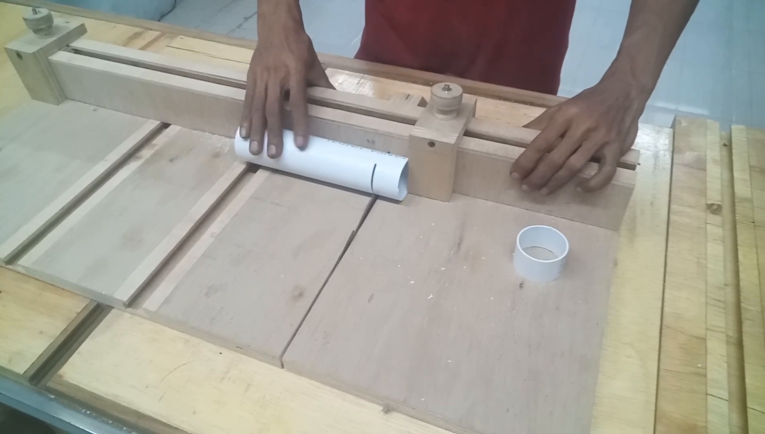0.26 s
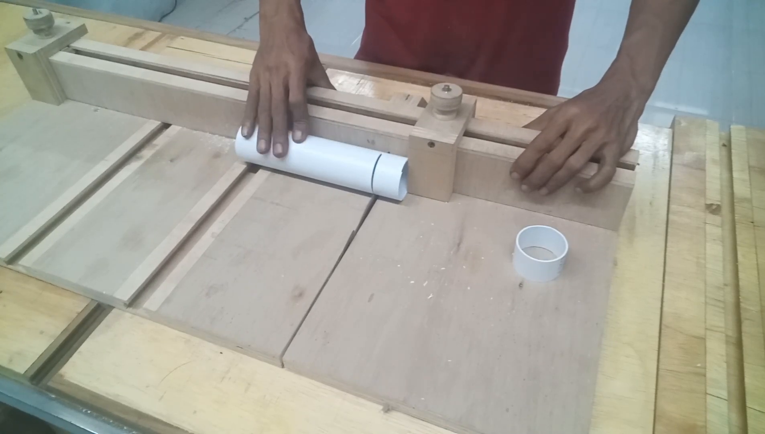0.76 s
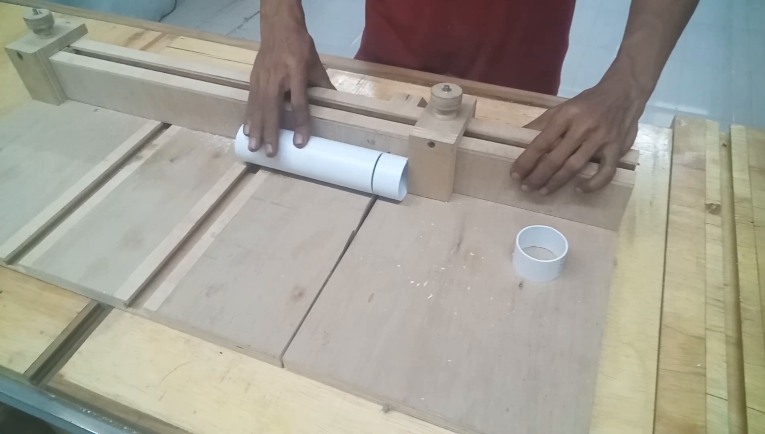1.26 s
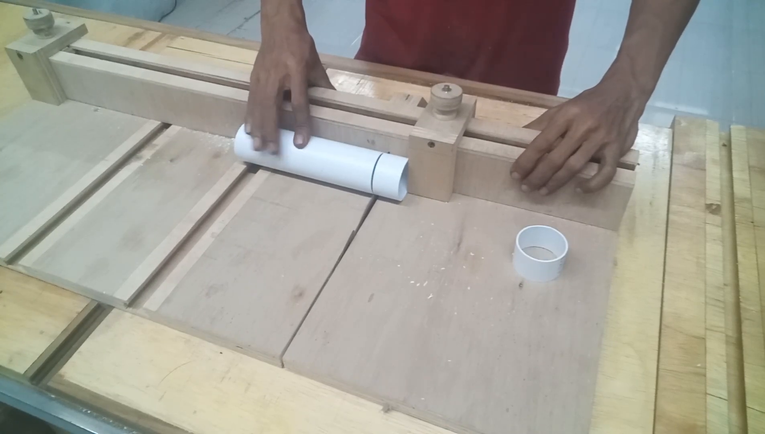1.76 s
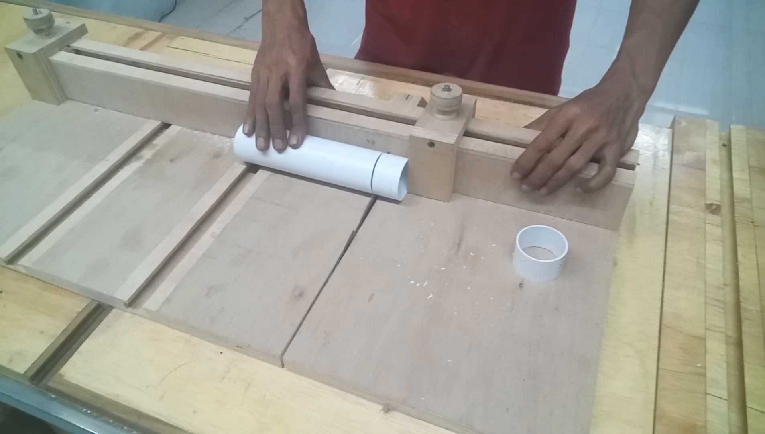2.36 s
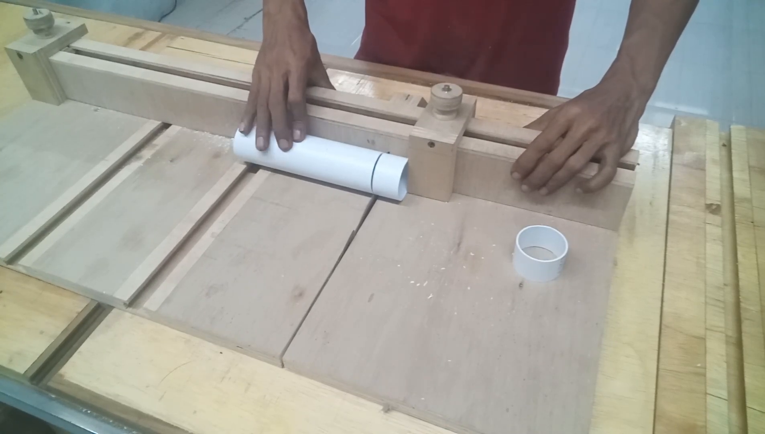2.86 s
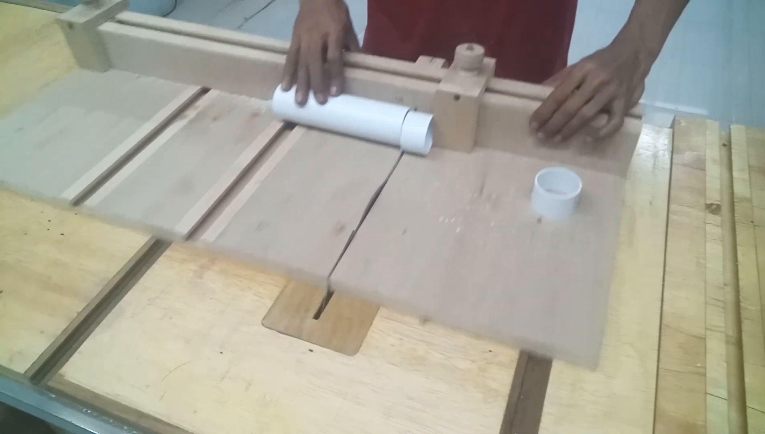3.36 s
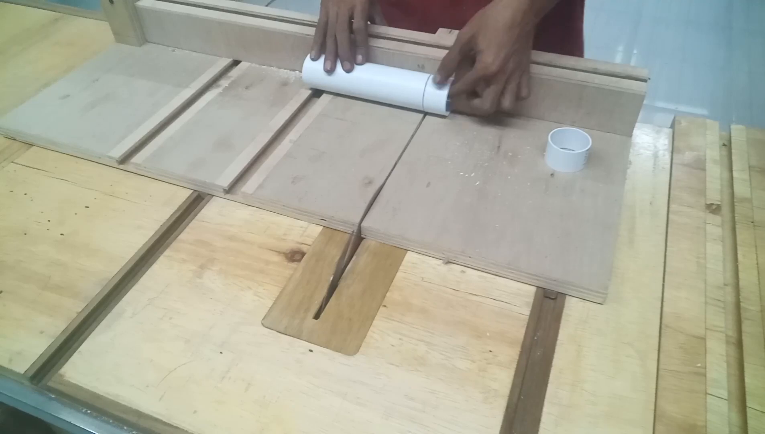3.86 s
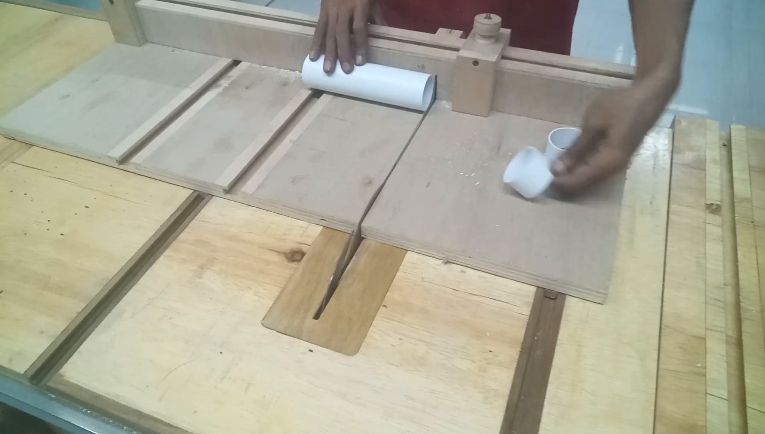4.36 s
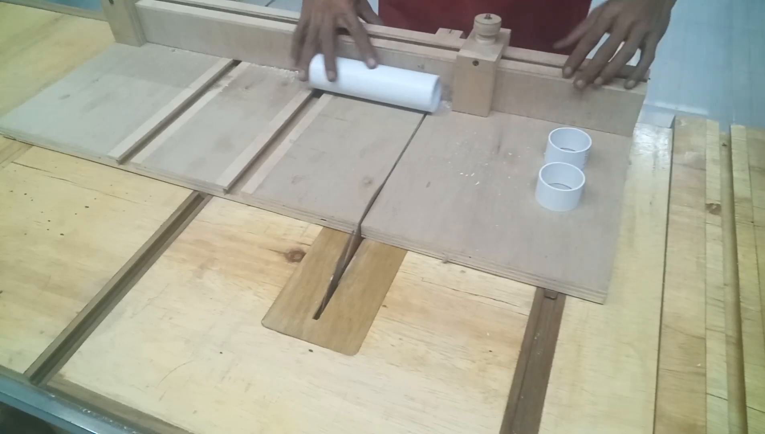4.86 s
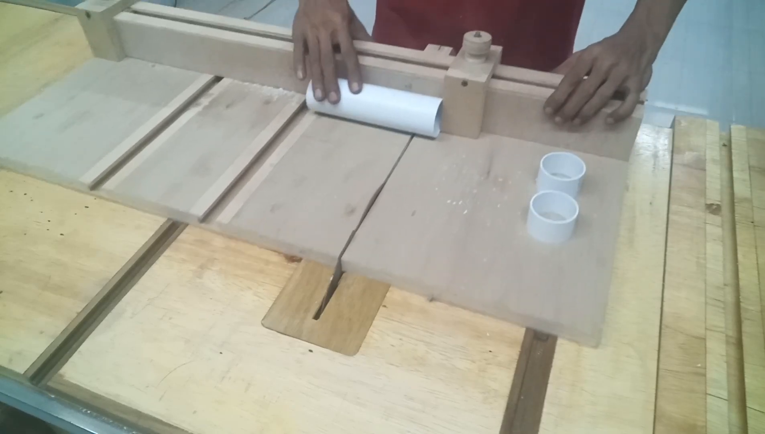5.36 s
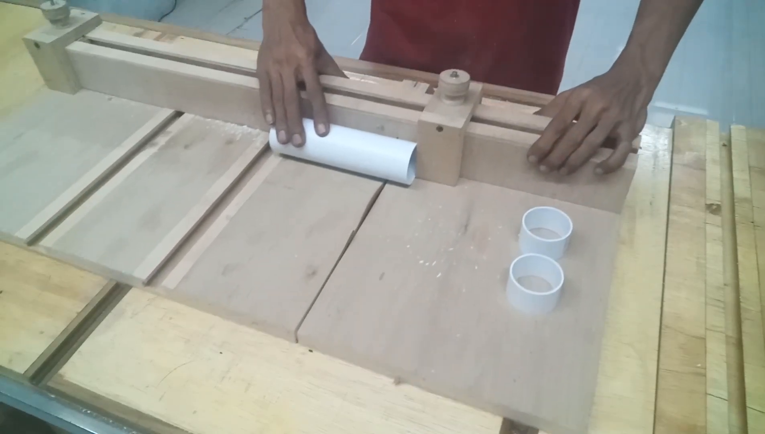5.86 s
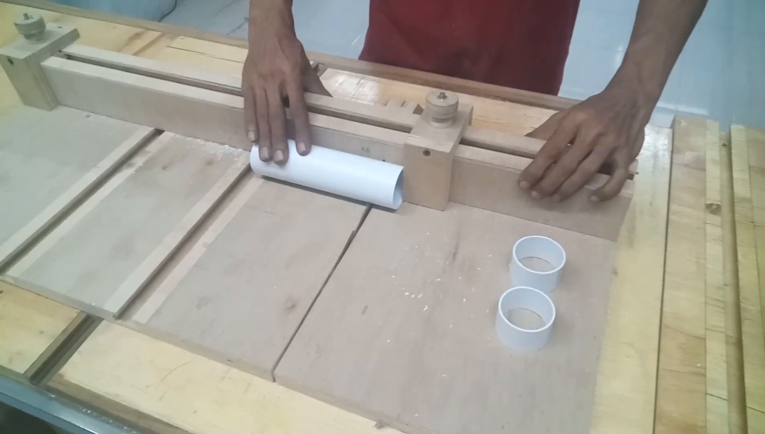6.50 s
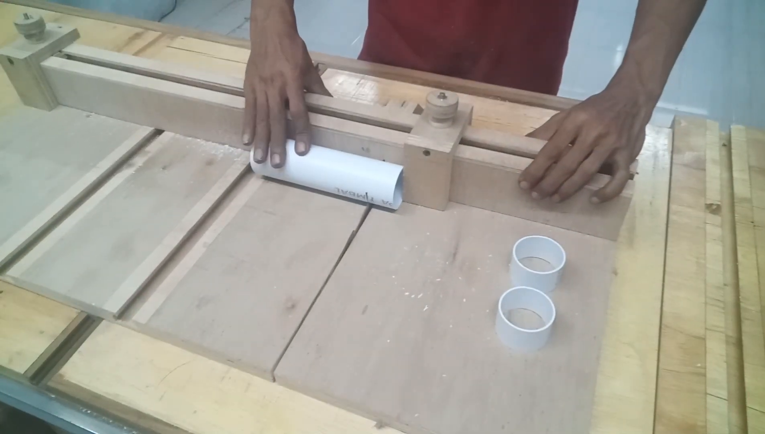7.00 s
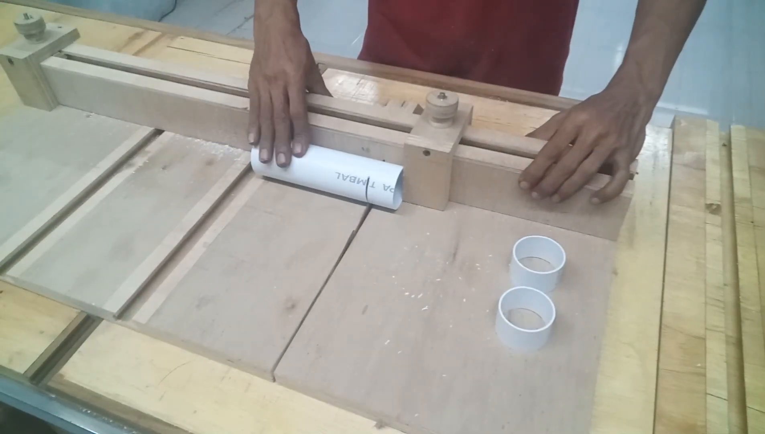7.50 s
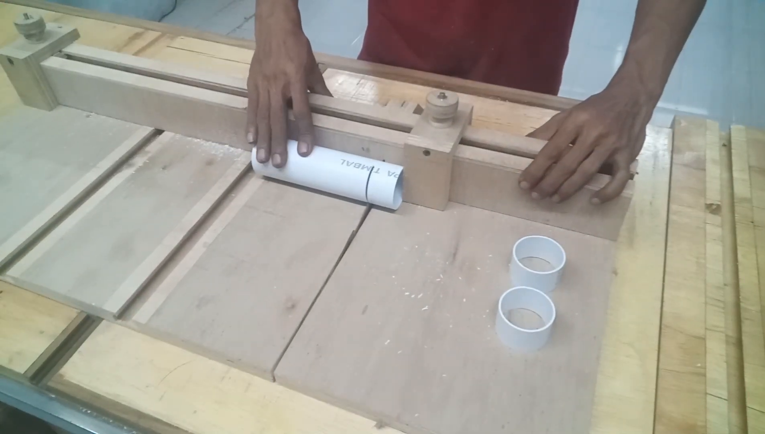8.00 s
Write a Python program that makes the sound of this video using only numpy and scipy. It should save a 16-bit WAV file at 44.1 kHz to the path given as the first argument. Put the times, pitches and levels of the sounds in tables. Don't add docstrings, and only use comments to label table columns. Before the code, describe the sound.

Close view of a small table saw in a light-walled workshop. Plastic pipe is rolled over the spinning blade in uneven pushes, giving shrill tooth whine, ringing pipe wall, hissing chips and wooden sled knocks. A small tick ends the cut near three seconds. The geared motor swells into a free whining roar, then a second, brighter cut begins with a hard knock at six seconds.

```python
import sys
import numpy as np
from scipy import signal
from scipy.fft import rfft, irfft, next_fast_len
from scipy.io import wavfile
from scipy.ndimage import uniform_filter1d

SR = 44100
rng = np.random.default_rng(int(sys.argv[2]) if len(sys.argv) > 2 else 0)


def to_wav(sig):
    pcm = np.clip(np.atleast_2d(sig), -1, 1) * 32767
    pcm = np.round(pcm).astype(np.int16)
    wavfile.write(sys.argv[1], SR, pcm.T)


def invert_db(level):
    return 10 ** (np.asarray(level, dtype=float) / 20)


N = 363384

# t/s, turns per second f/Hz
BLADE_SPEED = [(0, 82.9), (0.3, 82.9), (0.7, 82.42), (1.15, 82.38), (1.35, 82.72), (1.85, 82.62),
               (2.05, 82.95), (2.45, 82.83), (3, 83.3), (3.3, 83.12), (4.5, 83.8), (5.98, 83.8),
               (6.3, 82.42), (6.55, 82.8), (6.9, 82.88), (7.45, 82.66), (7.85, 82.4), (8.24, 82.65)]
# multiple of the gear rate, level/dB against the 2nd tone
UPPER_GEAR = [(4, -40), (5, -6), (7, -16.5), (11, -40), (12, -51), (25, -47), (30, -37.5)]
# f/Hz, level/dB per Hz
ROAR = [(30, -28), (60, -22), (90, -11.5), (300, -10.5), (800, -4.5), (1400, -5), (1900, -9.5), (3300, -9),
        (4500, -16.5), (6500, -24), (7600, -34.5), (10500, -38), (15500, -40)]
# f/Hz, width/Hz, level/dB over the roar
HOUSING = [(80.6, 13.4, 7), (169, 5.8, 8), (493, 3.1, 1), (650, 3.1, 2.5), (991, 29, 0.5), (1191, 8.9, -5),
           (1470, 4.5, -36), (2630, 63, 3), (3397, 18.5, 7.5), (6820, 24, 10), (11700, 500, 0.5),
           (13700, 920, 1.5)]
RIM_ERRORS = [(1, 0.62, .01), (2, 0.34, 0.072), (3, 0.19, 0.15), (4, 0.19, 0.66), (5, 0.095, 1.6),
              (6, 0.14, 4.8), (8, 0.1, 2.45), (10, 0.12, 5.3), (12, 0.1, 1.9), (14, 0.09, 3.5),
              (20, 0.09, 0.1)]
# f/Hz, level/dB per Hz
BITE = [(1700, -11), (2700, 9), (3300, 6), (3550, 8), (3850, 2.5), (4150, 10), (4400, -8), (5000, -9),
        (6600, -22), (9000, -25), (15500, -37)]
# f/Hz, level/dB per Hz
PIPE_RING = [(1400, -28), (1900, 10), (2150, 9), (2650, 10.5), (2950, -6), (3150, -33), (3500, -88)]
# f/Hz, level/dB per Hz
CHIPS = [(2500, -16), (3300, -1.5), (3800, -3.5), (4300, -16.5), (5500, -20), (7300, -20), (9300, -26.5),
         (12300, -25), (14300, -24), (15600, -28)]
# f/Hz, level/dB per Hz
SLED = [(35, -18), (80, 1.5), (165, 1), (250, -1), (330, -0.5), (600, -16.5), (1500, -14.5), (2500, -13.5),
        (4000, -72)]
# t/s, depth in runout heights
FEED = [(0.0, 1.1), (0.22, 1.2), (0.35, 0.88), (0.95, 1.1), (1.24, 0.72), (2.0, 0.95), (2.8, 1.3),
        (3.2, 1.2), (6.0, 0.33), (6.24, 0.17), (6.42, 4), (6.6, 0.87), (6.8, 1.7), (7.0, 2.2), (7.2, 2.5),
        (7.4, 1.8), (7.88, 2.1), (8.24, 2.5)]
# f/Hz, width/Hz, level/dB against the hiss
PLATE_MODES = [(4730, 660, -13.5), (6200, 610, -14), (8200, 410, -30), (10070, 240, -25.5),
               (11220, 690, -24.5), (13600, 1100, -17), (15500, 700, -19.5)]
# start t/s, end t/s, multiple of turn rate, level/dB
SINGING = [(0.07, 0.44, 42, -40), (0.1, 0.42, 50, -47), (0.17, 0.46, 30, -42), (0.17, 0.34, 34, -40),
           (0.17, 0.68, 37, -42), (0.21, 0.45, 28, -44), (0.23, 0.5, 32, -42), (0.53, 0.81, 28, -46),
           (1.29, 1.74, 36, -41), (1.31, 1.8, 43, -42), (1.32, 1.7, 37, -43), (1.55, 1.74, 32, -42),
           (1.98, 2.19, 42, -39), (2.0, 2.43, 30, -43), (2.01, 2.21, 50, -47), (0.52, 0.77, 32, -36),
           (2.11, 2.32, 37, -45), (2.39, 2.66, 36, -43), (2.41, 2.87, 42, -41), (2.49, 2.72, 37, -42),
           (2.56, 2.74, 50, -46), (2.99, 3.09, 32, -42), (7.03, 7.34, 38, -44), (6.33, 6.47, 28, -48),
           (1.3, 1.56, 32, -44), (6.99, 7.12, 50, -49), (6.96, 7.05, 60, -52), (7.55, 7.8, 32, -46),
           (6.3, 6.4, 32, -42), (8.0, 8.24, 38, -42), (2.52, 2.67, 30, -42), (2.54, 2.69, 35, -44),
           (2.58, 2.7, 44, -43), (2.65, 2.76, 41, -42), (2.84, 2.97, 67, -52), (7.47, 7.57, 39, -43),
           (7.59, 7.73, 38, -42), (7.67, 7.77, 41, -42), (8.09, 8.19, 37, -44), (8.11, 8.19, 42, -43),
           (0.18, 0.5, 41, -40), (0.55, 0.74, 43, -41), (6.0, 6.2, 41, -42), (6.0, 6.1, 42, -43),
           (0.86, 1.15, 47, -45), (0.95, 1.12, 39, -43), (0.88, 1.0, 45, -46), (1.3, 1.55, 56, -51),
           (0.5, 0.7, 60, -50), (1.99, 2.15, 41, -40), (2.22, 2.34, 39, -41), (2.2, 2.36, 42, -42),
           (0.3, 0.5, 39, -44), (6.84, 6.96, 40, -41)]
# start t/s, length/s, hiss level/dB, whine over hiss/dB, ring over hiss/dB
PUSHES = [(.055, 0.058, -39.5, 5, -9), (.17, 0.32, -35.5, 1, -5.5), (.5, 0.22, -37.5, 1, -3.5),
          (.82, 0.091, -42, 7.5, 0.5), (.9, 0.09, -40, 2.5, 1), (1.08, 0.1, -48.5, 8, 2),
          (1.27, 0.19, -40.5, 1, -2), (1.46, .05, -42, -3, -7), (1.52, 0.094, -34.5, -4.5, -7.5),
          (1.6, 0.11, -36.5, -2, -1), (1.73, .05, -44.5, 2, -9), (1.79, 0.087, -37.5, 3.5, -11),
          (1.86, 0.075, -33.5, -6, -4.5), (1.97, 0.15, -39.5, 9, -4), (2.2, 0.1, -47.5, 16, -1),
          (2.52, 0.16, -41.5, 8, -1.5), (2.75, 0.25, -40.5, -12, -4), (2.98, 0.089, -36.5, -15, 2.5),
          (2.84, .11, -50, 7, -5), (5.975, 0.11, -41.5, 4.5, -20), (6.1, 0.12, -41, 5, -6.5),
          (6.23, .15, -39, 2.5, -6.5), (6.51, 0.27, -40.5, 4.5, -21), (6.94, 0.17, -39, 6.5, -6),
          (7.09, 0.19, -41.5, -3, -5), (7.46, 0.17, -39.5, 1.5, -4), (7.6, 0.18, -38.5, -5, -4),
          (7.95, 0.099, -38.5, 1, -10), (8.04, 0.076, -39, 4, -11), (8.1, 0.12, -36.5, 0, -9)]
# start t/s, length/s, hiss level/dB, whine over
# hiss/dB, ring over hiss/dB
MORE_PUSHES = [
    (-.03, 3.2, -46, 2, -3),
    (1.993, 1.04, -43.5, 2, -4),
    (3.094, 0.076, -38, -17, -0.5),
    (3.15, 0.15, -52.5, 4, 4),
    (5.964, 2.4, -48.5, 6.5, -4),
    (6.778, .17, -61.5, 11, -7),
]
# start t/s, length/s, level/dB
JOLTS = [(.07, 0.025, -49), (.17, 0.24, -50), (.5, 0.078, -42.5), (.68, 0.014, -43), (.92, 0.084, -40),
         (1.05, 0.12, -46.5), (1.28, 0.22, -40.5), (1.5, 0.21, -39.5), (1.8, 0.1, -40.5), (1.98, 0.5, -52),
         (2.61, 0.079, -42), (2.7, 0.28, -48), (3.09, 0.033, -43), (5.98, 0.025, -37), (6.02, 0.035, -37),
         (6.13, 0.12, -37.5), (6.27, 0.074, -46.5), (6.6, 0.02, -42), (6.68, 0.035, -39),
         (6.72, 0.019, -33), (6.95, 0.025, -39.5), (7.05, 0.098, -41), (7.2, 0.042, -44),
         (7.48, 0.1, -47.5), (7.6, .14, -41.5), (7.97, 0.037, -41.5), (8.06, 0.051, -42),
         (8.16, 0.092, -37.5)]
# t/s, roar level/dB, 3rd gear tone over roar/dB
FREE_MOTOR = [
    (3.2, -48, -3),
    (3.45, -46, 2),
    (3.75, -39.5, 6.5),
    (4.02, -38.5, 5),
    (4.3, -42.5, 3),
    (4.51, -39, -4),
    (4.7, -40, -0.5),
    (5.68, -40.5, -2.5),
    (5.972, -41.5, -3),
]
# 1st, 2nd, 3rd level/dB over the roar
FREE_GEAR_DB = (4.5, 4.5, -0.4)
# 1st, 2nd, 3rd level/dB over the roar
LOADED_GEAR_DB = (-13, -5.5, -1.5)
# start t/s, length/s, 3rd tone level/dB
MESHING = [(.06, 0.4, -53), (0.752, 0.06, -55), (1.123, 0.13, -59), (1.52, 0.16, -58), (1.96, 0.38, -49),
           (2.44, 0.21, -47), (2.847, 0.16, -52), (3.123, 0.18, -43.5), (6.4, 0.084, -56),
           (6.62, 0.11, -54), (6.78, 0.15, -56.5), (7.0, 0.21, -63), (7.6, 0.12, -64), (7.8, 0.26, -61)]
# t/s, 1st level/dB, 2nd level/dB
GEAR_WAKE = [
    (3.25, -15, -6),
    (3.5, -1, -38),
    (3.72, -0.25, 0.1),
]
# t/s, lead in turns
GRIPS = [(0, .04), (.25, -.06), (1.2, -.04), (1.27, .37), (2.8, .35), (3.1, .25), (5.9, -.4), (6.34, -.36),
         (6.5, .07), (6.95, .05), (7.2, .2), (7.7, .33), (8.0, .8), (8.24, .8)]
# start t/s, length/s, level/dB
SURGES = [
    (.3, 0.18, -54),
    (2.5, 0.25, -49),
    (2.85, 0.32, -48),
    (4.93, 0.11, -47),
    (5.15, 0.17, -45),
    (5.6, 0.091, -42),
    (7.65, 0.099, -46.5),
    (8.05, 0.22, -46),
]
# [(start t/s, length/s, level/dB)]
OVERTONE_BANDS = [
    (6680, 120, [(.88, 0.11, -50), (1.06, 0.093, -50.5), (1.45, 0.15, -54), (2.58, 0.32, -49.5), (6.02, 0.12, -51), (6.52, 0.23, -52)]),
    (6430, 200, [(1.27, 0.37, -49), (1.84, 0.074, -58), (6.28, 0.083, -61), (6.95, .2, -60), (7.5, 0.21, -61), (8.05, 0.13, -56)]),
    (9970, 370, [(.06, 0.5, -57), (.85, 0.32, -66), (1.27, .45, -65), (1.8, 0.18, -68), (2.05, 0.34, -60), (2.52, 0.2, -58), (5.99, 0.32, -66)]),
    (11500, 350, [(.2, 0.37, -60), (.9, .15, -68), (1.3, 0.51, -63), (1.8, 0.63, -61), (2.5, .65, -60)]),
]
# t/s, peak level/dB
HARD_KICKS = [(0.521, -36), (.689, -31), (0.698, -34), (.943, -38), (.990, -27), (1.008, -37), (1.363, -29),
              (1.412, -26), (1.520, -35), (1.544, -28), (1.896, -31), (6.026, -36), (6.052, -16.5),
              (6.075, -33), (6.170, -24), (6.208, -27), (6.22, -34), (6.255, -32), (6.279, -26),
              (6.625, -26), (6.710, -32), (6.722, -24), (6.734, -18), (6.962, -33), (7.090, -33),
              (7.120, -33), (7.645, -28), (7.687, -30), (7.722, -35), (7.734, -28), (8.095, -33),
              (8.13, -34), (8.176, -31), (8.192, -28), (8.223, -21)]
# start t/s, length/s, level change/dB
TOOTH_TONE = [(.5, 0.22, -9), (.91, .14, -12), (1.33, .15, -15), (2.66, .1, -8), (2.97, .1, -12),
              (6.2, 0.08, -9), (6.5, .3, 3.5), (6.8, .14, 0), (6.94, 0.23, 1), (1.982, 0.23, 3),
              (2.2, 0.22, 0), (2.5, .14, 7), (2.824, 0.16, 6), (6.3, .19, -1)]
# start t/s, end t/s
LEAN_BOOM_S = (1.96, 3.2)

TEETH = 40
GEAR_RATIO = 5.49
ROOM_T60_S, ROOM_DB = 0.25, -13
PUSH_ATTACK_S, PUSH_RELEASE_S = 0.024, 0.07
JOLT_ATTACK_S, JOLT_RELEASE_S = 0.0083, 0.025
LOADED_ROAR_DB, FIRM_PUSH_DB, PRESSURE_SHARE = -47.5, -36, 0.63
LOADED_BASS_SHARE, BASS_HZ = 0.68, 128
TABLE_HZ, TABLE_DB, TABLE_RINGS_UNTIL_S = 890, 4, 2.75
LATE_BOOM_S, LEAN_BOOM_SHARE, BOOM_HZ = 6.85, 0.3, 115
SNAP_S, SNAP_DB, SNAP_HZ = 3.1052, -17.5, 2600
KICK_LEAD_S = 0.0005
SECOND_CUT_S, SECOND_CUT_TREBLE_DB, TREBLE_HZ = 6.05, 4, 8900
RING_LAG_SHARE = 0.55


def unit(x):
    return x / np.sqrt(np.mean(x ** 2))


def clock():
    return np.arange(N) / SR


def columns(table):
    s, *values = np.transpose(table)
    return [np.interp(clock(), s, v) for v in values]


def part(x, hz, side="low"):
    return signal.sosfiltfilt(signal.butter(2, hz, side, fs=SR, output="sos"), x)


def colour(x, points, peaks=(), causal=False):
    size = next_fast_len(N)
    hz = np.arange(size // 2 + 1) * SR / size + 1
    point_hz, point_db = np.transpose(points)
    gain = invert_db(np.interp(np.log(hz), np.log(point_hz), point_db, -120, -120))
    lift = 1 + sum(invert_db(db) / np.sqrt(1 + (2 * (hz - f) / w) ** 4) for f, w, db in peaks)
    if causal:
        cepstrum = irfft(np.log(gain + 3e-3), size)
        cepstrum[1:size // 2] *= 2
        cepstrum[size // 2 + 1:] = 0
        log_gain = rfft(cepstrum)
        gain = np.exp(log_gain.real + 1j * RING_LAG_SHARE * log_gain.imag)
    return unit(irfft(rfft(x, size) * gain * lift, size)[:N])


def walk(rate):
    k = int(SR / rate)
    held = np.repeat(rng.standard_normal(N // k + 1), k)
    return 1.67 * uniform_filter1d(uniform_filter1d(held, k), k)[:N]


def clicks(at, size):
    taps = np.floor(at)[:, None] + np.arange(-7, 9)
    gap = taps - at[:, None]
    shape = np.sinc(gap) * np.cos(np.pi * gap / 16) ** 2
    place = np.clip(taps, 0, N - 1).astype(int)
    return np.bincount(place.ravel(), (size[:, None] * shape).ravel(), N)


def steady(x):
    return x / np.sqrt(uniform_filter1d(x ** 2, size=2600) + 1e-3 * np.mean(x ** 2))


def bursts(rows, attack_s, release_s):
    power = np.full((len(rows[0]) - 2, N), 1e-9)
    for start, length, db, *over_db in rows:
        corners = np.cumsum([start, attack_s, max(length - attack_s, 1e-4), release_s])
        span = np.arange(max(int(corners[0] * SR), 0), min(int(corners[-1] * SR), N))
        shape = np.interp(span / SR, corners, [0, 1, 1, 0])
        level = invert_db(db + np.array([0, *over_db]))
        power[:, span] += (shape * level[:, None]) ** 2
    return 10 * np.log10(power)


def pressure():
    return bursts(PUSHES + MORE_PUSHES, PUSH_ATTACK_S, PUSH_RELEASE_S)


def room_echo(bench):
    t = np.arange(int(0.4 * SR)) / SR
    fade = np.exp(-np.log(1000) * t / ROOM_T60_S)
    tail = rng.standard_normal(len(t)) * fade * (t > 0.006)
    tail = signal.sosfilt(signal.butter(2, 600, "high", fs=SR, output="sos"), tail)
    return invert_db(ROOM_DB) * signal.fftconvolve(bench, tail / np.sqrt(np.sum(tail ** 2)))[:N]


def running_free():
    t = clock()
    return (t > FREE_MOTOR[0][0]) & (t < FREE_MOTOR[-1][0])


def motor_levels():
    free_db, third_db = columns(FREE_MOTOR)
    free = running_free()
    loaded_db = LOADED_ROAR_DB + PRESSURE_SHARE * (pressure()[0] - FIRM_PUSH_DB)
    mesh = invert_db(bursts(MESHING, 0.0087, 0.043)[0])
    first_db, second_db = columns(GEAR_WAKE)
    lift = [(first_db, 0), (second_db, 0.25), (third_db, 1)]  # (dB when free, share of the meshing)
    tones_db = []
    for free_over, loaded_over, (up, share) in zip(FREE_GEAR_DB, LOADED_GEAR_DB, lift):
        base_db = np.where(free, free_db + free_over + up, loaded_db + loaded_over)
        tones_db.append(20 * np.log10(invert_db(base_db) + share * mesh))
    surge = invert_db(bursts(SURGES, 0.041, 0.028)[0])
    roar = np.hypot(invert_db(np.where(free, free_db, loaded_db)), surge)
    return 20 * np.log10(roar), *tones_db


def table_tone():
    phase = 2 * np.pi * TABLE_HZ * clock() + 0.4 * walk(16)
    rows = [row for row in MESHING if row[0] < TABLE_RINGS_UNTIL_S]
    level_db = bursts(rows, 0.046, 0.037)[0] + TABLE_DB + 1.8 * walk(12)
    return invert_db(level_db) * np.sin(phase)


def motor():
    roar_db, *tones_db = motor_levels()
    shaft = 2 * np.pi * np.cumsum(columns(BLADE_SPEED)[0]) / SR
    orders = list(enumerate(tones_db, 1))
    orders += [(k, tones_db[1] + db) for k, db in UPPER_GEAR]
    gear = np.zeros(N)
    for k, db in orders:
        level = invert_db(db + 2.5 + 1.4 * walk(21.79))
        gear += level * np.sin(k * GEAR_RATIO * shaft + 0.44 * walk(11))
    pulse = 1 + 0.1 * np.cos(shaft)
    gusts = invert_db(0.7 * walk(30)) * invert_db(0.6 * walk(70))
    roar = colour(rng.standard_normal(N), ROAR, HOUSING) * pulse * gusts
    roar = roar - (1 - LOADED_BASS_SHARE) * part(roar, BASS_HZ) * ~running_free()
    return gear + invert_db(roar_db + 9.5) * roar + table_tone()


def snap():
    click = clicks(np.array([SNAP_S * SR]), np.ones(1))
    tick = signal.sosfilt(signal.butter(2, SNAP_HZ, fs=SR, output="sos"), click)
    return invert_db(SNAP_DB) * tick / tick.max()


def jumps():
    s, db = np.transpose(HARD_KICKS)
    thud = colour(-clicks(s * SR, invert_db(db)), SLED, causal=True)
    return thud * invert_db(db.max()) / np.abs(thud).max()


def knocks(turns):
    at = np.flatnonzero(np.diff(np.floor(np.maximum.accumulate(turns))) > 0) + 0.0
    chance = rng.standard_normal((len(at), 3)).T
    first = clicks(at - KICK_LEAD_S * SR + 12 * chance[0], invert_db(1.6 * chance[1]))
    rebound = clicks(at + 0.0058 * SR, 0.12 * invert_db(3.0 * chance[2]))
    return first + rebound


def thumps(slips, kicks):
    t = clock()
    thump = steady(colour(0.4 * unit(slips) - unit(kicks), SLED, causal=True))
    lean = (t > LEAN_BOOM_S[0]) & (t < LEAN_BOOM_S[1])
    return thump - (1 - LEAN_BOOM_SHARE) * part(thump, BOOM_HZ) * ((t > LATE_BOOM_S) | lean)


def plate_ping(kicks):
    fade = np.exp(-np.arange(400) / (0.0015 * SR))
    shiver = np.convolve(kicks, fade)[:N] * rng.standard_normal(N)
    return colour(shiver, [(5600, -19), (6550, -4), (7300, -17)])


def plate(drive):
    out = np.zeros(N)
    for hz, width, db in PLATE_MODES:
        band = [(hz - width, -20), (hz - width / 3, 0), (hz + width / 3, 0), (hz + width, -20)]
        out += invert_db(db + 1.6 * walk(9)) * colour(drive, band)
    return out


def overtones(drive):
    out = np.zeros(N)
    for hz, half, rows in OVERTONE_BANDS:
        band = [(hz - half - 320, -22), (hz - half, 0), (hz + half, 0), (hz + half + 320, -22)]
        out += invert_db(bursts(rows, 0.027, 0.11)[0]) * colour(drive, band)
    return out


def singing(turns, lead):
    out = np.zeros(N)
    for start, end, multiple, db in SINGING:
        span = np.arange(int((start - 0.03) * SR), min(int((end + 0.03) * SR), N))
        corners = [start - 0.03, start + 0.045, end - 0.04, end + 0.03]
        hold = np.interp(span / SR, corners, [0, 1, 1, 0])
        grip = np.interp(span, np.linspace(span[0], span[-1], 9), rng.standard_normal(9))
        angle = 2 * np.pi * (multiple * turns[span] + (multiple - TEETH) * lead[span])
        out[span] += hold * invert_db(db + 4.5 + 1.9 * grip) * np.cos(angle + 0.7 * grip[::-1])
    return out


def tooth_tone(whine, passed):
    spin = np.exp(2j * np.pi * passed)
    slow = whine / spin
    slow = uniform_filter1d(slow.real, size=1064) + 1j * uniform_filter1d(slow.imag, size=1064)
    change_db = np.zeros(N)
    for start, length, db in TOOTH_TONE:
        corners = np.cumsum([start - 0.02, 0.04, length - 0.04, 0.04])
        change_db += db * np.interp(clock(), corners, [0, 1, 1, 0])
    return whine + (invert_db(change_db) - 1) * 2 * (slow * spin).real


def blade(passed, depth, lead):
    tooth = np.arange(1, int(passed[-1]))
    at = np.interp(tooth, passed, np.arange(N))
    where = at.astype(int)
    angle = 2 * np.pi * (tooth / TEETH + lead[where])
    height = np.zeros(len(tooth))
    for k, size, phase in RIM_ERRORS:
        bearing = size * invert_db(min(k, 3) * 1.88 * walk(6)[where])
        height += bearing * np.cos(k * angle + phase + 0.4 * walk(4)[where])
    chip = np.logaddexp(0, 19.0 * (depth[where] + height)) / 5
    return at - 1.6 * height, chip


def cut():
    passed = np.cumsum(TEETH * columns(BLADE_SPEED)[0]) / SR
    turns = passed / TEETH
    hiss_db, whine_db, ring_db = pressure()
    thump_db = bursts(JOLTS, JOLT_ATTACK_S, JOLT_RELEASE_S)[0]
    depth, lead = columns(FEED)[0], columns(GRIPS)[0]
    at, chip = blade(passed, depth, lead)
    chance = rng.standard_normal((len(at), 3)).T
    strikes = clicks(at + 0.35 * chance[0], chip * invert_db(1.1 * chance[1]))
    slips = clicks(at, chip * invert_db(1.6 * chance[2]))
    load = steady(np.interp(np.arange(N), at, chip))
    kicks = knocks(turns + lead)

    whine = steady(tooth_tone(colour(strikes, BITE), passed))
    ring = steady(colour(slips, PIPE_RING))
    tear = (21.0 + load) * rng.standard_normal(N)
    loaded_tear = unit(tear * load)
    hiss = colour(tear, CHIPS) + plate(loaded_tear + 5.2 * steady(strikes))
    treble = part(hiss, TREBLE_HZ, "high")
    hiss = hiss + (invert_db(SECOND_CUT_TREBLE_DB) - 1) * treble * (np.arange(N) > SECOND_CUT_S * SR)
    thump = thumps(slips, kicks) + invert_db(-17.5) * plate_ping(kicks)

    chatter_db = 1.1 * walk(85)
    flicker_db = 1.2 * walk(26)
    mix = invert_db(whine_db) * whine + invert_db(ring_db) * ring
    mix += invert_db(hiss_db + flicker_db + chatter_db) * hiss
    mix += invert_db(thump_db) * thump + singing(turns, lead)
    return mix + invert_db(chatter_db) * overtones(steady(strikes) + 0.4 * loaded_tear)


def scene():
    bench = cut() + snap() + jumps()
    return (bench + room_echo(bench) + motor())[None]


def band_limit(x):
    return signal.sosfilt(signal.butter(12, 15390, fs=SR, output="sos"), x)


def record(dry):
    limit = 0.24
    return band_limit(limit * np.tanh(dry / limit))


dry = scene()
out = record(dry)
to_wav(out)
```